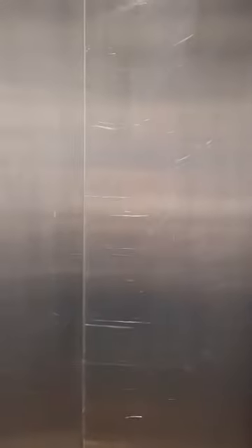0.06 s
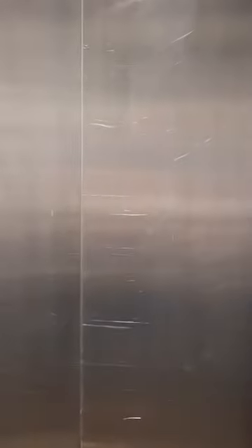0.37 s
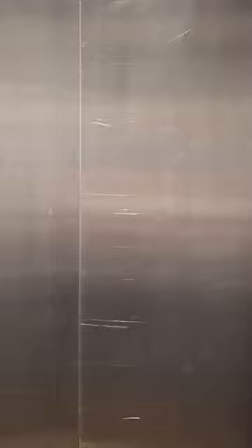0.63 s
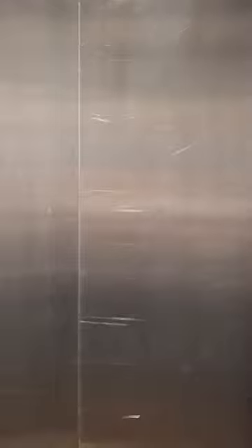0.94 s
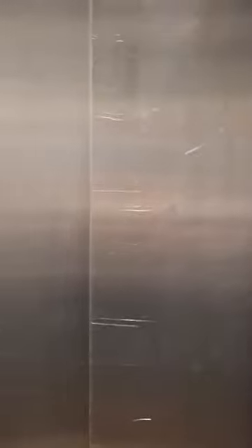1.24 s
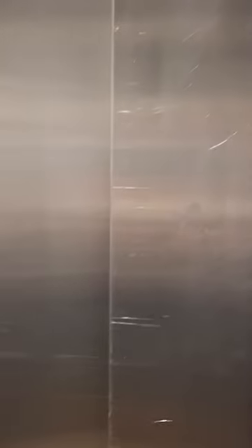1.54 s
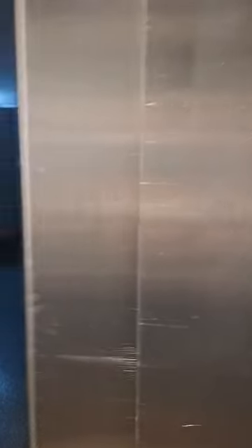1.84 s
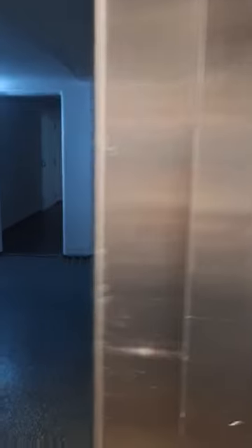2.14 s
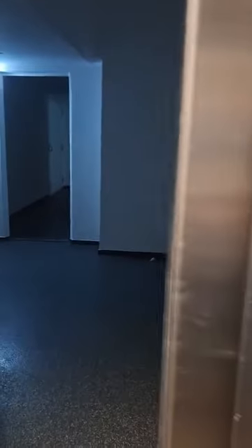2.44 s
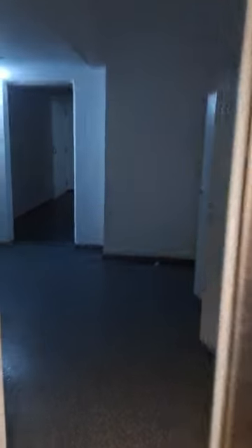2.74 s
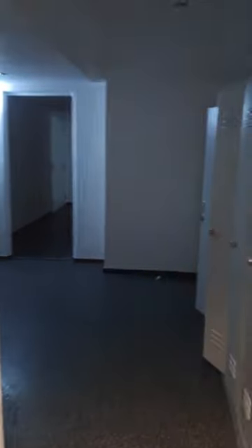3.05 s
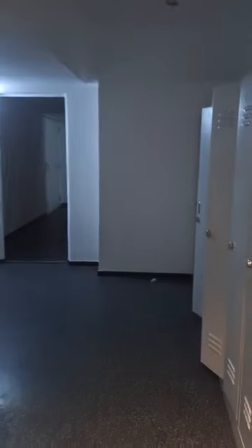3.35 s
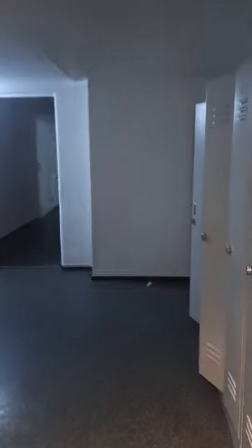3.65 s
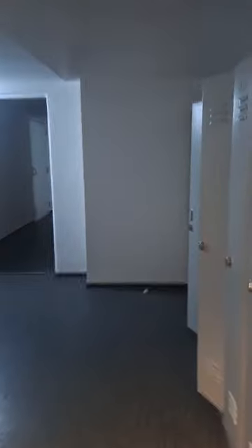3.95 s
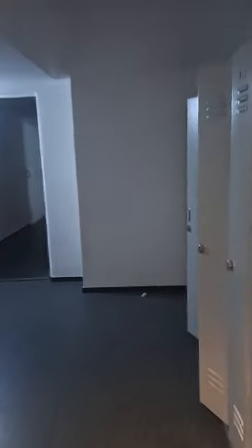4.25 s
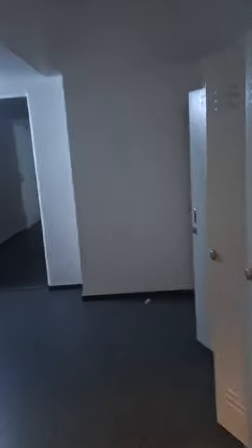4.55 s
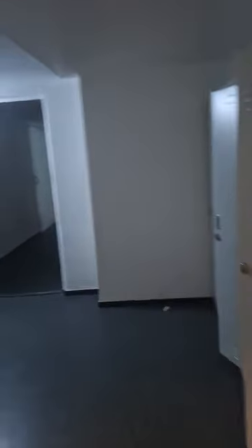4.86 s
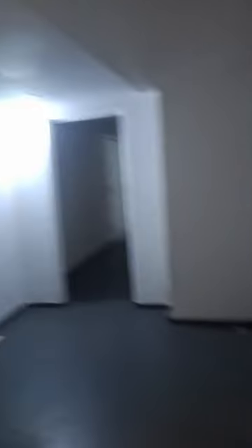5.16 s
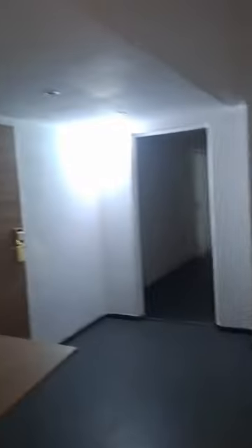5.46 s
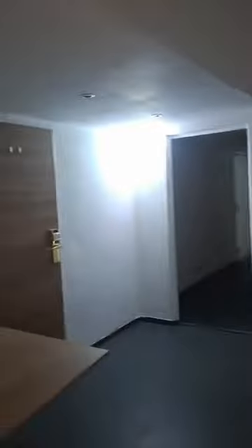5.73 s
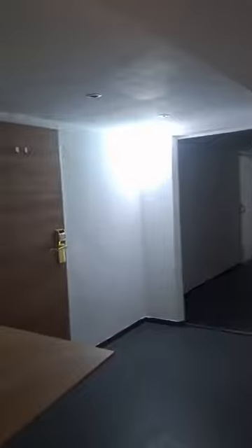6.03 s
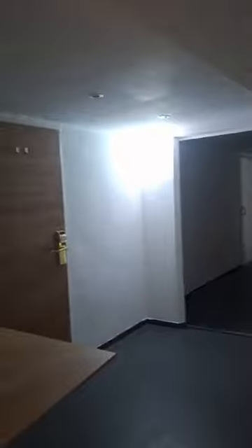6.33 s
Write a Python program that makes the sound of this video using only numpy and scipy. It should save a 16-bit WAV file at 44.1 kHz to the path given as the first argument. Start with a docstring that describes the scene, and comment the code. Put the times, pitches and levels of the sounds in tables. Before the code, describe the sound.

Automatic elevator doors are heard up close from the car. A quiet drive tone ends, metal clanks and booms as the lock releases, and the doors rumble open, shaking the steel walls. Sharp clicks and dull knocks come toward the end of the slide. As the doors settle, someone takes a few steps out onto a hard floor in a slightly echoing lobby, with low ventilation noise underneath.

```python
"""Sliding doors rumble open in a steel lift car: rollers grind, guides hiss, walls and panels shake.
First the drive's hum stops and the lock clanks free. Hangers click along the track, the doors bump
their stop, and someone steps out into a hard-floored lobby. Shaft rumble and ventilation lie beneath.
Hum and ringing steel are sines; the rest is shaped noise."""
import sys
import numpy as np
from scipy import signal
from scipy.fft import rfft, irfft, next_fast_len
from scipy.io import wavfile
from scipy.ndimage import uniform_filter1d

SR = 44100
rng = np.random.default_rng(int(sys.argv[2]) if len(sys.argv) > 2 else 0)


def wrap_up_sound(samples):
    """Save the sound to the file named by the first command line argument, as 16-bit audio."""
    columns = np.atleast_2d(samples).T
    # keep every value between -1 and 1, then stretch to whole-number steps
    tamed = np.clip(columns, -1, 1)
    steps = np.round(tamed * 32767).astype(np.int16)
    wavfile.write(sys.argv[1], SR, steps)


N = 281887
TIME = np.arange(N) / SR
FREQ = np.maximum(np.arange(N // 2 + 1) * SR / N, 1)
START_S, UNLOCK_S, BRAKE_S = 0.674, 0.9, 3.58


# time_s, speed_ratio (glide = 1)
DOOR_SPEED = [(0.9, .33), (1.2, 0.77), (1.48, 0.75), (1.62, 0.87), (1.98, 0.99), (2.12, 1.015), (2.65, .98),
              (3.05, 0.98), (3.28, 0.79), (3.42, 1.05), (3.8, 0.79), (4.12, 0.12)]

def door_speed(inertia_s=0.02):
    """The doors creep, speed up, glide and brake, lagging the drive by their inertia."""
    keep = np.exp(-1 / (inertia_s * SR))
    drive = np.interp(TIME, *np.transpose(DOOR_SPEED))
    return np.maximum(signal.lfilter([1 - keep], [1, -keep], drive), 1e-6)


def effort(glide_db, power, strain_db, swell_db, hold_s, release_s):
    """Door gain: a power of speed, plus motor strain that swells until unlock, holds and lets go."""
    swell = undb(np.interp(TIME, [START_S, UNLOCK_S], [strain_db - swell_db, strain_db]))
    strain = swell * np.exp(-np.maximum(TIME - UNLOCK_S - hold_s, 0) / release_s)
    onset = np.clip((TIME - START_S) / 0.013, 0, 1)
    return onset * np.hypot(undb(glide_db) * door_speed() ** power, strain)


# car, wall and door panel resonances: pitch_hz, width_hz, level_db
CAR_SWAY_MODES = [(44.3, 3.9, 13), (53.2, 29, 11.5)]
WALL_MODES = [(89.7, 7, 0), (103, 9, -5), (122, 12, -15), (169, 9, -18), (244, 8, -17)]
DOOR_PANEL_MODES = [(244, 9, -8), (294, 10, -3), (316, 10, 0), (338, 11, 0), (382, 11, -2), (404, 12, -7),
                    (447, 10, -2), (476, 14, -6), (548, 16, -9), (648, 18, -13)]

def door_rumble():
    """Rolling doors shake the car, its walls and their own panels; braking rocks the car again."""
    rock = undb(-27.5) * blow(BRAKE_S, rise_s=0.14, decay_s=0.14)
    sway = effort(glide_db=-37, power=1.72, strain_db=-20, swell_db=14, hold_s=0.27, release_s=0.17)
    drum = effort(glide_db=-38, power=1.4, strain_db=-23, swell_db=2.5, hold_s=0.02, release_s=0.3)
    ring = effort(glide_db=-43.5, power=1.9, strain_db=-25, swell_db=22, hold_s=0.035, release_s=0.081)
    car = pan(4.1) * np.hypot(rock, sway) * shaken(CAR_SWAY_MODES)
    walls = pan(4.7) * drum * shaken(WALL_MODES)
    panels = pan(-0.3) * ring * shaken(DOOR_PANEL_MODES)
    return car + walls + panels


# friction spectra: freq_hz, level_db
ROLLER_SPECTRUM = [(200, 1), (450, -3), (600, 3.5), (800, 3), (1100, -4.5), (1600, -8.5), (2100, -19.5),
                   (3000, -39), (6000, -31.5), (16000, -39)]
GUIDE_SPECTRUM = [(1000, -15), (2100, -6.5), (2700, -2.5), (3400, -8.5), (4600, 2), (5600, -10.5),
                  (7500, -6.5), (8800, -17), (11500, -12), (13500, -9.5), (16000, -12)]

def rollers_and_guides():
    """Rollers grind and guides hiss in the sill; the uneven track roughens both together."""
    roll = effort(glide_db=-44.5, power=1.58, strain_db=-34.5, swell_db=19, hold_s=0.039, release_s=0.16)
    slide = effort(glide_db=-58, power=1.5, strain_db=-45.5, swell_db=42, hold_s=0.095, release_s=0.11)
    track = walk(70)
    # the steel box picks out narrow resonances
    grind = unit(room(noise(ROLLER_SPECTRUM), wet_db=7.5, low_t60_s=0.14, high_t60_s=0.19))
    rollers = pan(-1.0) * roll * undb(1.9 * track) * grind
    guides = pan(0.86) * slide * undb(track) * noise(GUIDE_SPECTRUM)
    return rollers + guides


# door and floor bumps: start_s, boom_db, knock_db, decay_s
BUMP_HITS = [(0.886, -15, -23.5, 0.036), (1.11, -20.5, -42, 0.067), (1.66, -33.5, -61, 0.17),
             (2.53, -31, -55, 0.11), (2.80, -34.5, -44.5, 0.07), (3.598, -27.5, -33.5, 0.1),
             (3.649, -31, -35.5, 0.04), (3.715, -31.5, -43, 0.04), (3.85, -31, -46, 0.058),
             (3.925, -44, -47, 0.068), (4.289, -42.5, -51.5, 0.15), (4.430, -43, -60, 0.25)]
# boom spectrum: freq_hz, level_db
BOOM_SPECTRUM = [(25, -27), (42, -1.5), (95, 8.5), (140, -16), (220, -28.5), (450, -26.5), (700, -39),
                 (2000, -35), (8000, -63)]
# frame resonances: pitch_hz, width_hz, level_db
DOOR_FRAME_MODES = [(163.7, 22, -0.5), (191, 14, 1), (225, 11, -5), (248.4, 9.3, 2.5), (295, 21, 2.5),
                    (384, 14, -13), (454, 140, -11)]

def bumps():
    """Heavy, soft blows boom through the car and knock the door frame."""
    boom = sum(undb(db) * blow(start, 0.02, decay) for start, db, _, decay in BUMP_HITS)
    knock = sum(undb(db) * blow(start, 0.0071, decay) for start, _, db, decay in BUMP_HITS)
    return pan(3.3) * boom * noise(BOOM_SPECTRUM) + pan(0.27) * knock * shaken(DOOR_FRAME_MODES)


# clanks and rebounds: start_s, level_db, rise_s, decay_s, hook_db
LOCK_CLANKS = [(0.794, -43.5, 0.0091, 0.15, -78), (0.864, -27.5, .012, 0.019, -62),
               (0.886, -26.5, 0.0055, .028, -40), (0.912, -41, 0.0067, 0.024, -43),
               (0.963, -25, 0.0058, 0.029, -27.5), (0.990, -38.5, 0.0048, 0.021, -35)]
# lock rattle and hook rasp: freq_hz, level_db
RATTLE_SPECTRUM = [(150, 13), (400, 7.5), (900, 1), (1200, -4), (1600, -1), (2200, -4.5), (4400, -5.5),
                   (5300, -10.5), (7000, -9), (9500, -24.5), (12000, -41.5), (16000, -25)]
RASP_SPECTRUM = [(3000, -20), (5000, 2), (8000, 0), (9700, -4), (11500, -3), (16000, -5)]
# lever and its door panel: pitch_hz, level_db, t60_s
LOCK_LEVER_MODES = [(243.5, -3, 1.3), (311.2, 10, 1.43), (474, -6, 0.61), (879, -6.5, .8), (1205, 5, 0.47),
                    (1527, 4.5, 1.1), (1710, 2, 0.65), (2610, -1, .3), (3488, -5, 0.28), (4120, 4.5, 0.23),
                    (4420, 6, 0.17), (6160, -1, 0.28)]
# steel hook: pitch_hz, width_hz, level_db
LOCK_HOOK_MODES = [(8088, 45, -2), (9065, 60, -7), (10255, 45, -3.5), (11378, 60, -2), (12665, 45, 0),
                   (13730, 70, -8), (13870, 70, -10), (15330, 70, -8), (15440, 70, -11)]

def lock():
    """The lock clatters free; its lever rings low, its chattering hook rasps and rings high."""
    clatter = sum(undb(db) * blow(start, rise, decay) for start, db, rise, decay, _ in LOCK_CLANKS)
    chatter = sum(undb(db) * blow(start, rise, decay) for start, _, rise, decay, db in LOCK_CLANKS)
    rattle = pan(-0.37) * clatter * undb(2.0 * walk(350)) * noise(RATTLE_SPECTRUM)
    lever_hits = [(start, db - 7.5, rise) for start, db, rise, _, _ in LOCK_CLANKS]
    lever = pan(-1.5) * struck(LOCK_LEVER_MODES, lever_hits, spread=0.0049)
    rasp = undb(-7 + 3.2 * walk(360)) * noise(RASP_SPECTRUM)
    hook = pan(-2.0) * chatter * (resonant_noise(LOCK_HOOK_MODES) + rasp)
    return room(rattle, wet_db=-4.5, low_t60_s=0.46, high_t60_s=0.094) + lever + hook


# clicks: start_s, knock_db, snap_db, snap_hz, plate_db, snap_decay_s
HANGER_CLICKS = [(1.135, -49, -58, 4340, -56, 0.025), (1.572, -53, -73, 4600, -67, 0.024),
                 (2.078, -47, -62, 4660, -61, 0.043), (2.746, -33.5, -34.5, 5960, -30.5, 0.026),
                 (2.929, -40.5, -39, 7400, -50, 0.014), (3.145, -50.5, -59.5, 4400, -58, 0.08),
                 (3.338, -36.5, -36.5, 5700, -45.5, 0.022), (3.515, -43, -43, 7300, -56, 0.027),
                 (3.601, -37, -46, 3350, -51, 0.021), (3.732, -44.5, -58, 3300, -62, 0.037),
                 (3.826, -57, -60.5, 7340, -68, 0.026), (4.212, -63, -67, 7200, -65, 0.0063)]
# dull knock and bright snap: freq_hz, level_db
KNOCK_SPECTRUM = [(150, -18), (350, 13), (480, -1), (650, 5), (1000, -6), (1500, -2), (2200, -6.5),
                  (3200, -11.5), (4500, -11), (6500, -13.5), (9000, -20.5), (16000, -28)]
SNAP_SPECTRUM = [(2000, -27), (4500, -31), (7000, 6), (9000, 1), (12000, 3), (16000, -6)]
# hanger plates: pitch_hz, level_db, t60_s
PLATE_MODES = [(1277, -10.5, 0.9), (1688, -3, 0.53), (1980, -11, 0.44), (2664, 1.5, 0.28),
               (3500, -9.5, 0.39), (4070, -0.5, 0.24), (4840, -8, 0.23), (5200, -9, 0.34), (5400, 2, 0.16),
               (5800, -2, 0.13), (6500, 2.5, 0.1), (9540, -6, 0.14)]

def hangers():
    """Door hangers knock and snap over the track; their plates ring and the car echoes."""
    body, edge = noise(KNOCK_SPECTRUM), noise(SNAP_SPECTRUM)
    clicks = np.zeros((2, N))
    for start, knock_db, snap_db, snap_hz, _, decay in HANGER_CLICKS:
        band = pan(7.1) * resonant_noise([(snap_hz, 0.23 * snap_hz, 0)])
        treble = pan(-5.0) * undb(-4.5) * (snap_hz / 7000) ** 2 * edge
        clicks += undb(knock_db) * blow(start, 0.0069, 2 * decay) * body
        clicks += undb(snap_db) * blow(start, 0.0024, decay) * (band + treble)
    plate_hits = [(start, db, 0.003) for start, _, _, _, db, _ in HANGER_CLICKS]
    plates = pan(1.2) * struck(PLATE_MODES, plate_hits, spread=0.0019)
    clicks *= undb(2.03 * walk(500))
    return room(clicks, wet_db=-7, low_t60_s=0.98, high_t60_s=0.66) + plates


# footfalls: start_s, thud_db, scuff_db, rise_s, decay_s
FOOTFALLS = [(4.290, -54, -61.5, .006, 0.2), (4.381, -41, -57, .005, 0.075),
             (4.423, -36, -50, 0.034, 0.029), (4.552, -63, -50, 0.0029, 0.035),
             (4.964, -55, -49, 0.016, 0.077), (5.175, -71, -55.5, 0.0084, 0.038),
             (5.27, -58.5, -64, 0.016, 0.14), (5.478, -54.5, -56.5, 0.011, 0.081),
             (5.661, -29, -47.5, 0.0047, 0.047), (5.704, -53, -53.5, 0.026, 0.032),
             (5.747, -50, -45, 0.0022, 0.068)]
# squeaks and grit ticks: start_s, pitch_hz, width_hz, level_db, decay_s
SOLE_SQUEAKS = [(4.292, 780, 600, -55, .08), (4.415, 800, 900, -42, .045), (4.428, 4700, 600, -55, .02),
                (4.552, 5000, 500, -52, .014), (4.970, 800, 400, -54, .03), (4.978, 4500, 400, -60, .02),
                (5.168, 7900, 1100, -61, .015), (5.173, 1370, 200, -51, .025),
                (5.745, 10500, 6000, -45, .018), (5.750, 3300, 400, -49, .017), (6.090, 5740, 70, -74, .07)]
# shoe spectra: freq_hz, level_db
HEEL_SPECTRUM = [(50, -18), (130, -15), (175, -1), (230, 2), (290, -2), (430, -1.5), (520, -1), (700, -10),
                 (1000, -22.5), (1350, -20), (2000, -21.5), (3000, -29.5), (12000, -44.5)]
SOLE_SPECTRUM = [(200, -19), (800, 8), (1500, 4.5), (2400, -1), (3800, -5.5), (7600, -2.5), (9000, -14),
                 (12000, -11), (16000, -21)]

def footsteps():
    """Heels thud, soles scuff and squeak on the hard floor; the lobby rings after them."""
    thud = sum(undb(db) * blow(start, rise, decay) for start, db, _, rise, decay in FOOTFALLS)
    scuff = sum(undb(db) * blow(start, rise, decay) for start, _, db, rise, decay in FOOTFALLS)
    squeak = sum(undb(db) * blow(start, 0.0072, decay) * resonant_noise([(hz, width, 0)])
                 for start, hz, width, db, decay in SOLE_SQUEAKS)
    grit = undb(2.0 * walk(600))
    shoes = thud * noise(HEEL_SPECTRUM) + scuff * grit * noise(SOLE_SPECTRUM) + squeak
    return room(pan(0.4) * shoes, wet_db=-4.0, low_t60_s=1.0, high_t60_s=0.48)


def drive_hum(pitch_hz=302, level_db=-50.5):
    """The drive holds the car with one tone until the doors start."""
    held = np.exp(-np.maximum(TIME - START_S + 0.02, 0) / 0.026)
    tone = unit(np.sin(2 * np.pi * pitch_hz * TIME))
    return pan(-1.1) * undb(level_db + 0.43 * walk(24)) * held * tone


# shaft rumble and lobby ventilation: freq_hz, level_db
SHAFT_SPECTRUM = [(20, -11), (33, -22), (43, 3), (65, -15), (100, -6), (140, -34), (250, -25), (350, -36),
                  (470, -30), (650, -45.5), (1000, -54), (3000, -61), (16000, -63)]
VENT_SPECTRUM = [(20, -33), (45, 0), (70, -4.5), (103, 10.5), (150, -5), (260, -7.5), (480, -2), (700, -10),
                 (1800, -18.5), (2600, -32), (4500, -37), (7500, -31.5), (9000, -41), (16000, -42.5)]

def air(shaft_db=-46.5, vent_db=-51.5):
    """The car stops swaying over a low shaft rumble; lobby ventilation enters as the doors part."""
    settling = np.interp(TIME, [0.3, 0.42], [undb(-50), 0]) * shaken(CAR_SWAY_MODES)
    inside = np.interp(TIME, [4.0, 5.0], [1, 0])
    shaft = inside * undb(shaft_db) * noise(SHAFT_SPECTRUM)
    opening = np.interp(TIME, [1.7, 3.0], [0, 1])
    drift_db = 0.46 * walk(5.14) + np.interp(TIME, [5.2, 6.3], [1.2, -1.2])
    vent = opening * undb(vent_db + drift_db) * noise(VENT_SPECTRUM)
    return pan(2.6) * (settling + shaft) + pan(1.6) * vent


def undb(db):
    """Decibels to gain."""
    return 10 ** (np.asarray(db) / 20)


def unit(x):
    """Scale to rms 1."""
    return x / np.sqrt(np.mean(x ** 2))


def pan(db):
    """Channel gains for a left minus right level."""
    return undb(np.array([[db], [-db]]) / 2)


def walk(rate_hz):
    """Random steps, smoothed twice; spread near 1."""
    hold = max(int(SR / rate_hz), 1)
    steps = np.repeat(rng.standard_normal(N // hold + 1), hold)
    return 1.42 * uniform_filter1d(uniform_filter1d(steps, hold), hold)[:N]


def blow(start_s, rise_s, decay_s):
    """Contact envelope: linear rise, exponential decay."""
    age = TIME - start_s
    attack = np.clip(age / max(rise_s, 1e-4), 0, 1)
    return attack * np.exp(-np.clip((age - rise_s) / max(decay_s, 1e-3), 0, 40))


def field(gain, split_hz=530):
    """Stereo noise, rms 1: long waves reach both channels alike, short ones unrelated."""
    size = next_fast_len(N)
    hz = np.arange(size // 2 + 1) * SR / size
    mid, side = rfft(rng.standard_normal((2, size)))
    apart = np.clip(0.13 + hz ** 4 / (hz ** 4 + split_hz ** 4), 0, 1)
    both = (mid + apart * side * np.array([[1], [-1]])) / np.sqrt(1 + apart ** 2)
    return unit(irfft(both * np.interp(hz, FREQ, gain), size)[:, :N])


def noise(spectrum):
    """Stereo noise shaped by (freq_hz, level_db) points."""
    hz, db = np.transpose(spectrum)
    return field(undb(np.interp(np.log(FREQ), np.log(hz), db)))


def resonant_noise(modes):
    """Stereo noise in steep-skirted peaks."""
    power = sum(undb(2 * db) / (1 + ((FREQ - hz) / (0.49 * width)) ** 2) ** 1.87
                for hz, width, db in modes)
    return field(np.sqrt(power))


def shaken(modes):
    """Resonances kept ringing by a steady random push."""
    ring = resonant_noise(modes)
    local_power = uniform_filter1d(np.mean(ring ** 2, axis=0), SR // 7)
    return ring / np.sqrt(local_power + 1e-6)


def struck(modes, hits, spread, count=3):
    """Struck steel: each mode is a beating cluster of sines, phased apart in each channel."""
    out, t = np.zeros((2, N)), TIME[:SR // 2]
    total = np.sqrt(count / 2 * sum(undb(2 * db) for _, db, _ in modes))
    for start_s, hit_db, rise_s in hits:
        first = int(start_s * SR)
        for hz, db, t60_s in modes:
            cluster_hz = hz * (1 + spread * rng.standard_normal((count, 1, 1)))
            phase = 2 * np.pi * (cluster_hz * t + rng.random((count, 2, 1)))
            envelope = np.exp(-np.log(1000) * t / t60_s) * np.minimum(t / rise_s, 1)
            out[:, first:first + len(t)] += undb(hit_db + db) / total * envelope * np.sin(phase).sum(0)
    return out


def room(x, wet_db, low_t60_s, high_t60_s):
    """Add a diffuse tail with separate decays below and above 2500 Hz."""
    t = TIME[:SR]
    white = field(np.ones(len(FREQ)))[:, :SR]
    low = signal.sosfilt(signal.butter(2, 2500, fs=SR, output="sos"), white)
    high = signal.sosfilt(signal.butter(2, 2500, "high", fs=SR, output="sos"), white)
    tail = low * np.exp(-np.log(1000) * t / low_t60_s) - high * np.exp(-np.log(1000) * t / high_t60_s)
    tail = unit(tail * np.minimum(t / 0.0028, 1)) / np.sqrt(SR)
    return x + undb(wet_db) * signal.fftconvolve(x, tail, axes=1)[:, :N]


def scene():
    """Everything heard from the car's doorway."""
    doors = drive_hum() + door_rumble() + rollers_and_guides() + lock() + hangers()
    return doors + bumps() + footsteps() + air()


def record(dry, low_hz=33, top_hz=15850):
    """Cut the deepest bass and the top treble."""
    thin = signal.sosfilt(signal.butter(8, low_hz, "high", fs=SR, output="sos"), dry)
    return signal.sosfilt(signal.ellip(10, 0.2, 80, top_hz, fs=SR, output="sos"), thin)


dry = scene()
out = record(dry)
wrap_up_sound(out)
```